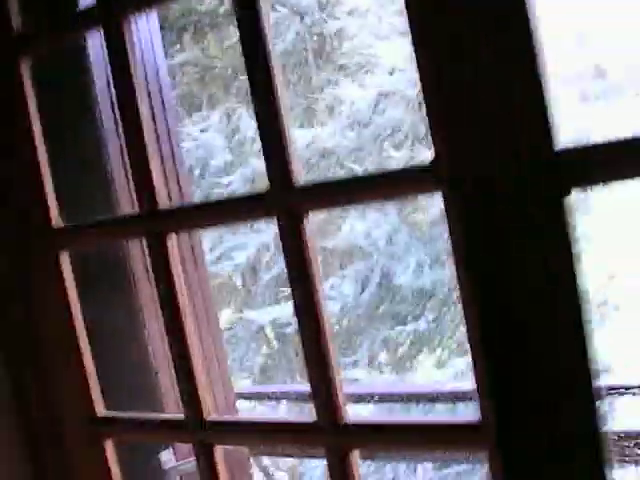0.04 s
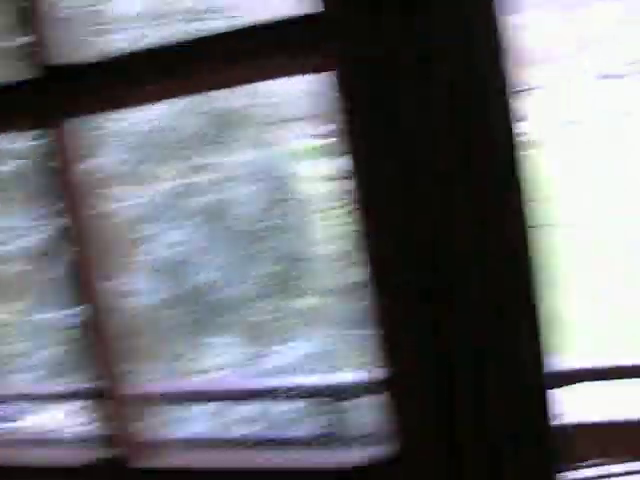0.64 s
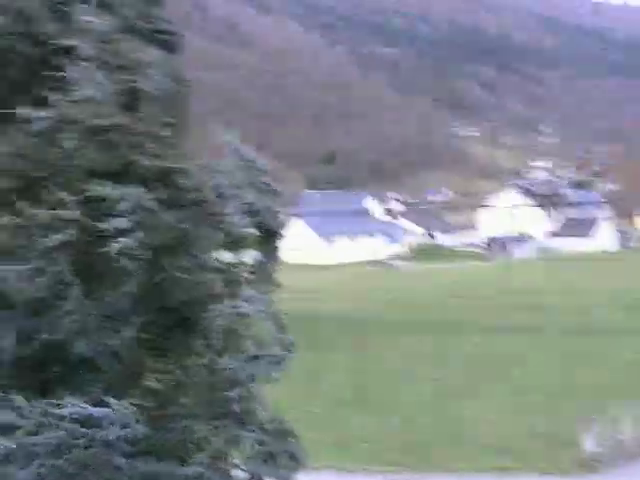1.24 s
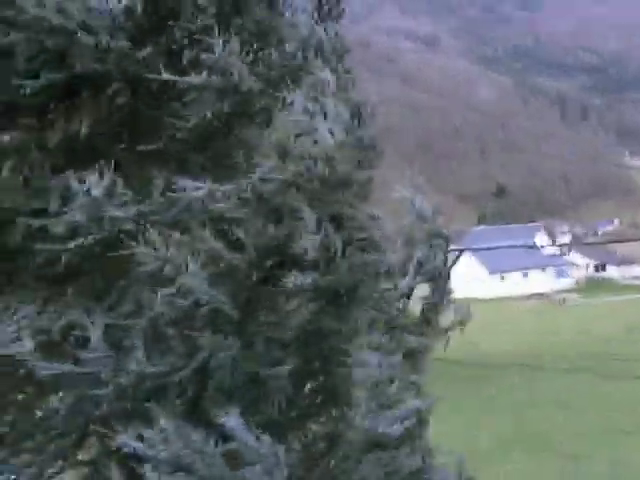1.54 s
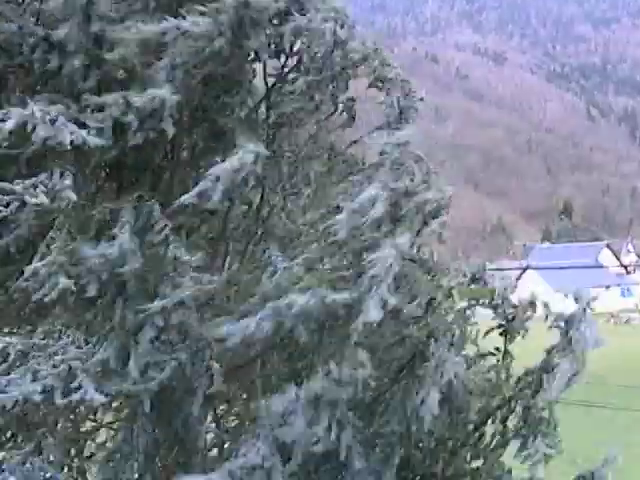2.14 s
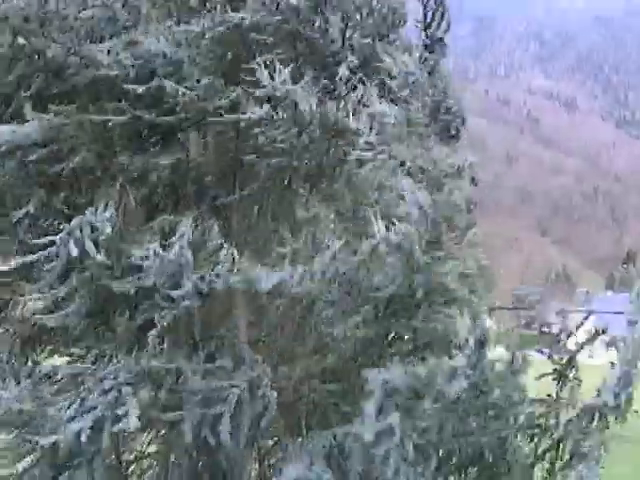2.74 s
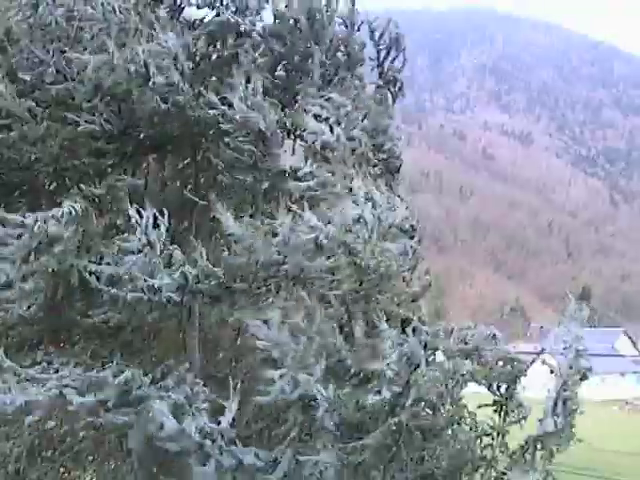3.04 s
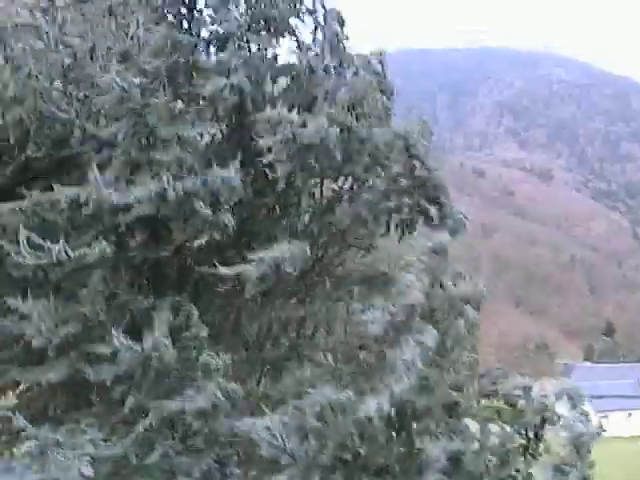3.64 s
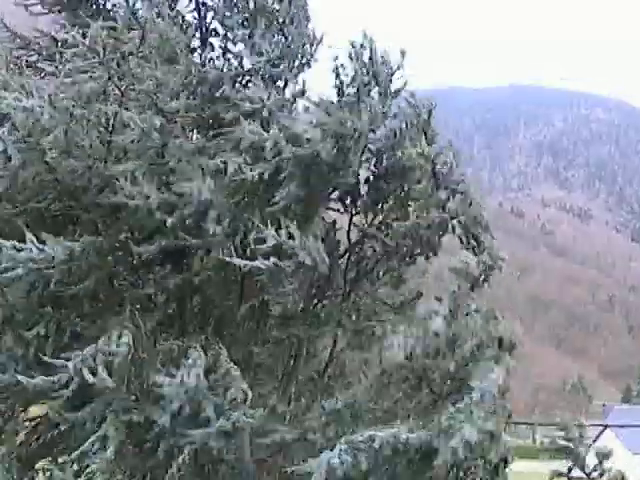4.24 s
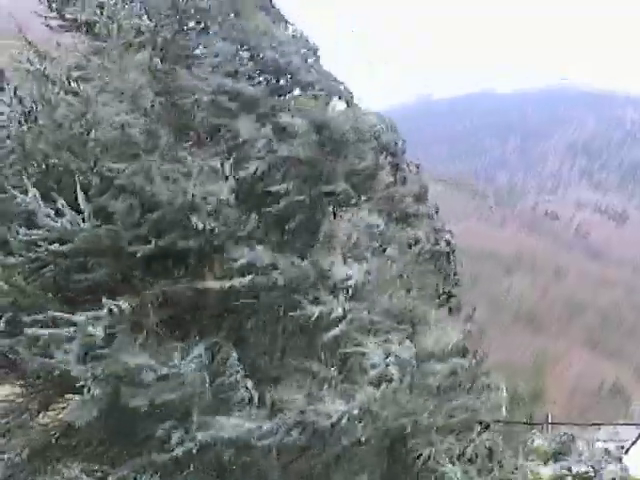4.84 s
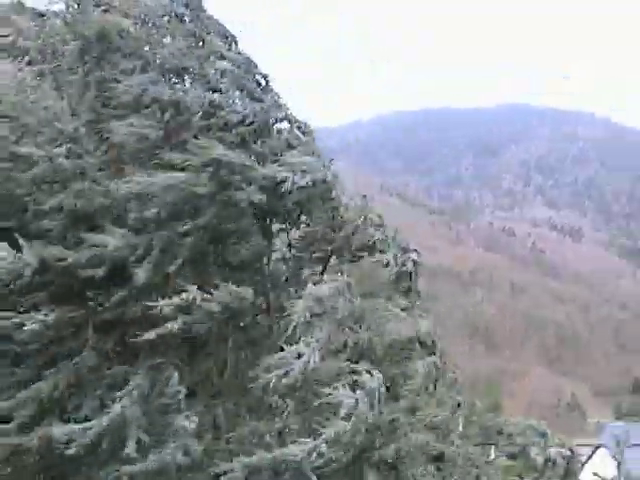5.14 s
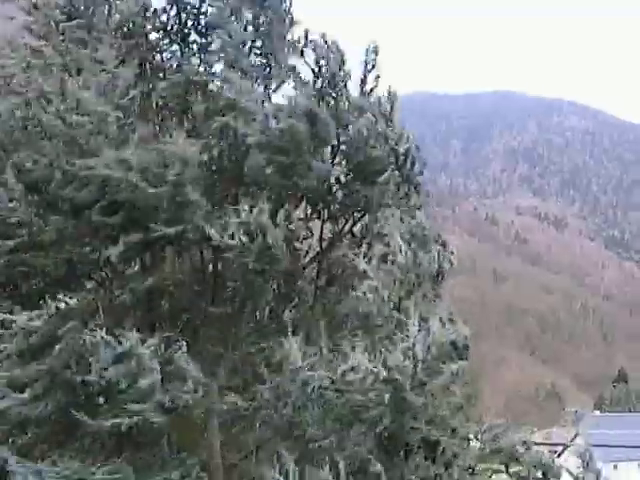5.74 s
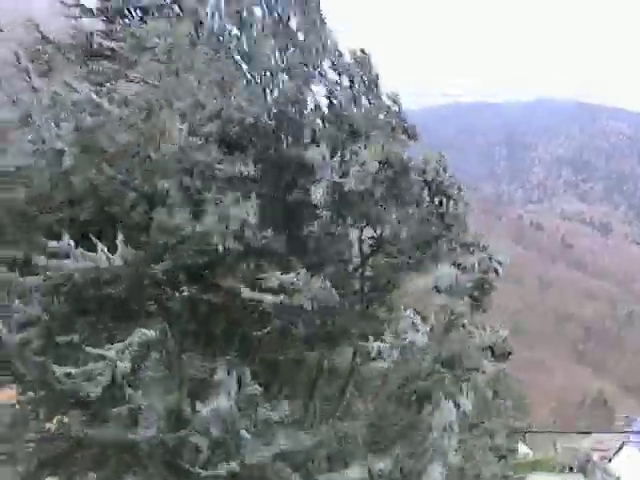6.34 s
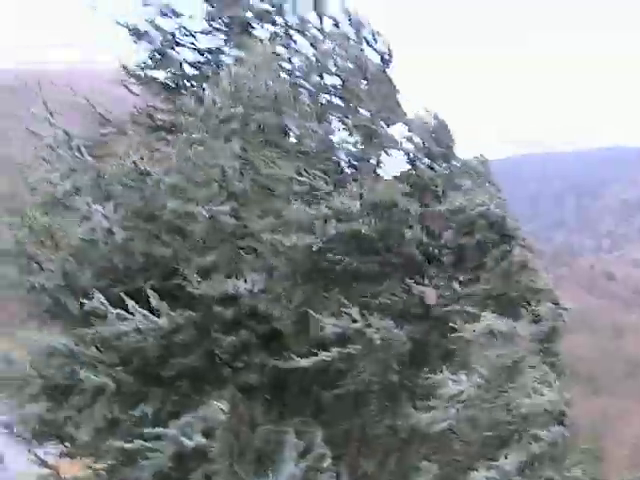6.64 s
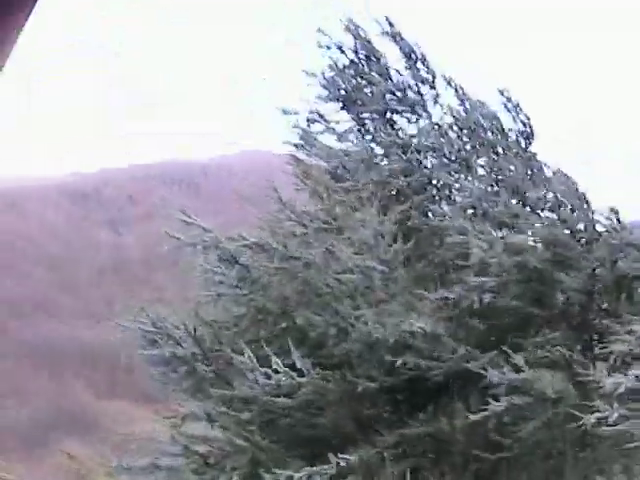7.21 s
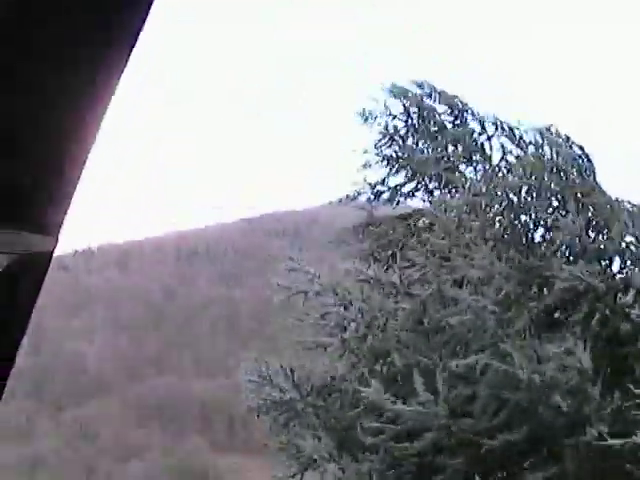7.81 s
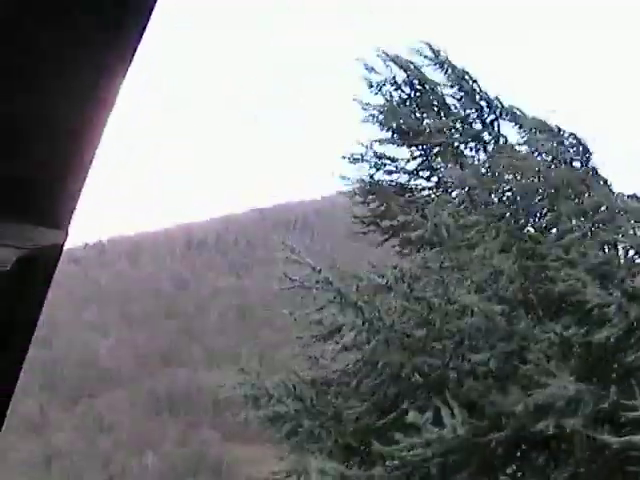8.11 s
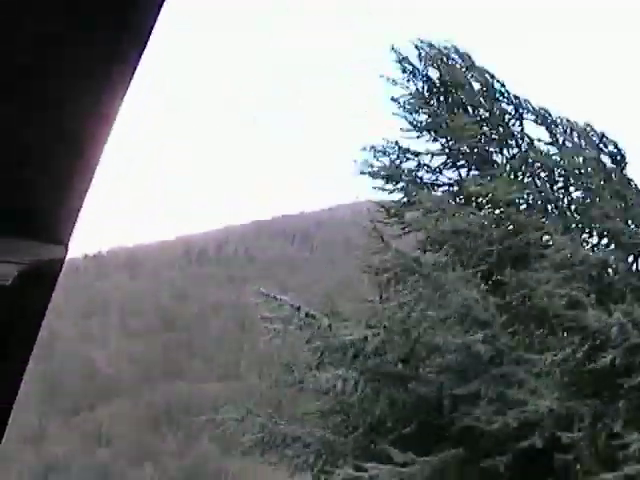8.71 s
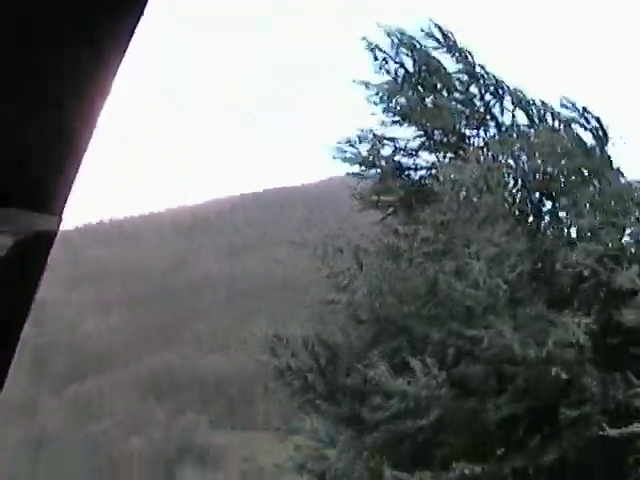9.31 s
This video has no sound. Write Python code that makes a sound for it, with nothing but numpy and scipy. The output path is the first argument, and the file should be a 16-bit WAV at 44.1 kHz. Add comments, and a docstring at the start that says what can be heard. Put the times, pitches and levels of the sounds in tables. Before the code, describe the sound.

Storm wind blows through a big conifer outside an open window, a broad hiss of needles over a low boom. It starts subdued and quickly swells to a roar. Gusts buffet and slap the hand-held microphone with ragged rumbles, and the strongest make the whole roar drop abruptly and spring back. Faint gliding whistles pass midway. Near the end the buffeting eases while the roar continues.

```python
"""A hiss of needles over a low boom: storm wind roars through a big conifer outside an open window.
Air sheds vortices from needles and branches as broadband noise, and from twigs as gliding whistles.
Eddies buffet and slap the two microphone ports of a small hand-held camera. The strongest gusts
press so hard on the microphone that its limiter pulls the whole roar down."""
import sys
import numpy as np
from scipy import signal
from scipy.fft import rfft, irfft
from scipy.io import wavfile
from scipy.ndimage import uniform_filter1d

SR = 44100
rng = np.random.default_rng(int(sys.argv[2]) if len(sys.argv) > 2 else 0)


def wav_record(signal):
    """Record a signal, one row per channel, as 16-bit PCM in the file named by sys.argv[1]."""
    frames = np.transpose(np.atleast_2d(signal))
    bounded = np.clip(frames, -1, 1)
    # unit amplitude maps onto the largest positive 16-bit level
    quanta = np.round(bounded * 32767).astype(np.int16)
    wavfile.write(sys.argv[1], SR, quanta)


N = 413216
TIME = np.arange(N) / SR
FREQS = np.maximum(np.arange(N // 2 + 1) * SR / N, 1)

# wind in the crown: (time [s], relative hiss level [dB], extra body around 900 Hz [dB])
CROWN_WIND = [(0, -27, -4), (0.11, -31.5, -3.5), (0.33, -30, -4), (0.6, -24.5, -6.5), (1.0, -23, -2),
              (1.5, -18, -4), (2.5, -21.5, 0.5), (2.85, -17.5, -0.5), (3.25, -21, 2.5), (4.2, -17.5, 0.5),
              (4.72, -15.5, 0), (5.0, -17, 1), (5.62, -15, -0.7), (6.85, -18, 2.5), (7.62, -17, 4),
              (8.2, -18.5, 0.5), (8.8, -16, 0), (9.37, -15, -1)]


def undb(db):
    """Amplitude ratio of a level in decibels."""
    return 10 ** (np.asarray(db) / 20)


def curve(table, column=1):
    """Linear interpolation of one column of a time table at every sample."""
    rows = np.array(table)
    return np.interp(TIME, rows[:, 0], rows[:, column])


def across(points):
    """Interpolation of a frequency table on a logarithmic axis."""
    hz, value = np.transpose(points)
    return np.interp(np.log(FREQS), np.log(hz), value)


def unit(x):
    """Normalisation to rms 1."""
    return x / np.sqrt(np.mean(x ** 2))


def smooth(x, seconds):
    """Low-pass filtering by a running mean."""
    return uniform_filter1d(x, max(int(seconds * SR), 1))


def drift(cutoff_hz):
    """Random modulation: low-pass noise of rms 1."""
    return unit(irfft(rfft(rng.standard_normal(N)) * np.exp(-(FREQS / cutoff_hz) ** 2), N))


def noise(gain, correlation):
    """Coloured stereo noise of rms 1; the ratio of mid to side sets its left-right correlation."""
    mid, side = rfft(rng.standard_normal((2, N)))
    c = np.clip(correlation, -.99, .99)
    mid, side = mid * np.sqrt(1 + c), side * np.sqrt(1 - c)
    return unit(irfft(np.array([mid + side, mid - side]) * gain, N))


def steady(x, seconds):
    """Division by the running rms holds a noise level over spans longer than seconds."""
    power = np.mean(x ** 2, axis=0)
    return x / np.sqrt(smooth(smooth(power, seconds), seconds))


def surges(events, rest_db, rise_db_per_s, sag_db_per_s, fall_db_per_s):
    """Upper envelope in dB of events that rise to a peak at their time, sag while held, then decay."""
    out = rest_db
    for time, hold, db in events:
        age = TIME - time
        drop_db = rise_db_per_s * np.maximum(-age, 0) + sag_db_per_s * np.clip(age, 0, hold)
        drop_db += fall_db_per_s * np.maximum(age - hold, 0)
        out = np.maximum(out, db - drop_db)
    return out


def needle_hiss(level_db=2.0, sway_db=0.16, flicker_db=1.16, thrash_db=-0.36):
    """Vortex shedding: thick branches give the roar its body, fine needles its treble edge."""
    # hiss spectrum: (frequency [Hz], relative density [dB])
    spectrum = [(200, -13), (420, -6.5), (700, -5.5), (1200, -3.5), (1700, -3.5), (2400, 0), (3300, -1.5),
                (4200, -2.5), (5500, -6), (6500, -8.5), (10000, -15), (13400, -22.5)]
    # likeness of the hiss at the two ports: (frequency [Hz], correlation [1])
    correlation = [(60, 0.93), (300, 1), (1000, 0.93), (2000, 0.67), (3200, 0.29), (5000, .36),
                   (13000, 0.15)]
    # lean of the hiss to one side: (frequency [Hz], left minus right [dB])
    lean = [(200, 0), (650, -0.5), (1200, -2), (2200, -3), (3900, 0), (7000, 1.3)]
    # the camera draws back behind the window frame, dulling the hiss: (time [s], treble tilt [dB])
    frame_shadow = [(6.9, 0.3), (7.7, -0.6)]
    wind_db, body_db = curve(CROWN_WIND), curve(CROWN_WIND, column=2)
    tilt_db = 3.5 * np.tanh((wind_db + 16.5) / 4.5) + curve(frame_shadow)  # faster air is brighter
    balance = undb(np.array([[.5], [-.5]]) * across(lean))
    hiss = rfft(noise(undb(across(spectrum)) * balance, across(correlation)))
    octave = np.clip(np.log2(FREQS / 400), 0, 5)
    out = 0
    for k in range(6):  # boughs of each size sway and flicker in their own octave
        band = irfft(hiss * np.maximum(1 - abs(octave - k), 0), N)
        centre_hz = 400 * 2 ** k
        body = body_db * np.exp(-(np.log2(centre_hz / 900) / 0.58) ** 2 / 2)
        edge = tilt_db * np.tanh(2 * np.log2(centre_hz / 3600)) / 2
        out = out + band * undb(body + edge + sway_db * drift(1.9) + flicker_db * drift(18))
    return out * undb(level_db + wind_db + thrash_db * drift(31))  # all thrash together


def storm_boom(level_db=-3.0, follow=0.64, build_db_per_s=0.19):
    """Low-frequency flow noise around the house swells less than the hiss and builds with the storm."""
    # boom spectrum: (frequency [Hz], relative density [dB])
    spectrum = [(25, -12), (60, -17), (100, -7), (160, -7), (215, 0.5), (280, -2), (320, -10), (370, -29.5),
                (600, -42.5)]
    swell_db = follow * (curve(CROWN_WIND) + 16) - 16 + build_db_per_s * TIME
    roar = steady(noise(undb(across(spectrum)), correlation=0.98), 0.047)
    return roar * undb(level_db + swell_db)


def buffeting(level_db=1, wander_db=0.74, flutter_db=2.76, lurch_db=0.55):
    """Turbulent pressure: an eddy pushes on one port as it sucks on the other, largely in antiphase."""
    # eddy spectrum: (frequency [Hz], relative density [dB])
    spectrum = [(22, -42), (45, -3.5), (65, -3.5), (100, 1.5), (160, 2), (220, -0.5), (280, -1.5),
                (320, -14), (375, -22.5), (550, -24), (800, -27), (1500, -32.5), (5000, -61)]
    # swirls of rough air passing the ports: (time [s], hold [s], relative level [dB])
    swirls = [(0.63, 0.045, -29), (0.81, 0.019, -17.5), (1.07, .22, -13), (1.36, 0.17, -23.5),
              (1.62, .15, -15.5), (1.78, .235, -14), (2.16, .23, -12.5), (2.49, 0.26, -11.5),
              (2.88, 0.018, -19), (2.98, .02, -15.5), (3.46, 0.028, -11), (3.62, 0.035, -8),
              (3.77, 0.17, -12), (4.02, 0.025, -7), (4.5, 0.032, -22), (5.0, 0.14, -13.5),
              (5.52, 0.11, -15), (5.7, 0.019, -9.5), (5.82, 0.059, -9.5), (5.98, .14, -13),
              (6.24, 0.12, -9.5), (6.49, 0.077, -8.5), (6.67, 0.033, -11.5), (6.76, 0.66, -16),
              (7.35, 0.56, -14), (7.9, 0.28, -17.5), (8.76, .04, -18.5), (9.07, 0.048, -10.5),
              (9.35, 0.024, -21)]
    rumble = steady(noise(undb(across(spectrum)), correlation=-0.69), 0.034)
    calm_db = curve(CROWN_WIND) - 17.5
    swirl_db = surges(swirls, calm_db, rise_db_per_s=265, sag_db_per_s=0.5, fall_db_per_s=144)
    ragged_db = lurch_db * drift(13) + flutter_db * drift(36)
    side_db = wander_db * drift(4.7) * np.array([[1], [-1]])
    return rumble * undb(level_db + swirl_db + ragged_db + side_db)


def air_slaps(crackle_db=-6, thump_db=-2, length_s=0.014, tear_db=3, thump_hz=240, width_hz=50):
    """Pressure pulses: a slap of air thumps both ports in phase, under a torn, uncorrelated crackle."""
    # slaps on the ports: (time [s], relative crackle level [dB], relative thump level [dB])
    slaps = [(1.186, -17, -4), (1.932, -15.5, -13.5), (2.015, -17.5, -17), (2.55, -19, -21),
             (3.45, -14, -20), (3.621, -21, -7.5), (3.661, -20, -18), (5.726, -15.5, -16),
             (5.89, -16.5, -11), (6.249, -28, -10.5), (6.51, -15, -24), (6.576, -17, -28),
             (7.356, -14.5, -20), (7.498, -21, -33)]
    # crackle spectrum: (frequency [Hz], relative density [dB])
    spectrum = [(200, 1), (380, -3.5), (560, 4), (750, -7), (1400, -12.5), (9000, -48)]
    crackle = steady(noise(undb(across(spectrum)), correlation=0), 0.022)
    crackle *= undb(crackle_db + tear_db * drift(250))
    thump_band = np.exp(-((FREQS - thump_hz) / width_hz) ** 2)
    thump = steady(noise(thump_band, correlation=1), 0.034) * undb(thump_db)
    out = np.zeros((2, N))
    for time, high_db, low_db in slaps:
        on = abs(TIME - time) < 10 * length_s
        pulse = np.exp(-((TIME[on] - time) / length_s - .5) ** 2)
        out[:, on] += pulse * (undb(high_db) * crackle[:, on] + undb(low_db) * thump[:, on])
    return out


def gust_pressure():
    """Dynamic pressure: gusts load the microphone with slow shoves, mostly below the audible range."""
    # shoves of wind: (time [s], hold [s], level over the limiter threshold [dB])
    shoves = [(1.232, 0.079, 8), (1.672, 0, 9), (1.705, 0, 15.5), (1.782, 0.052, 21), (1.828, 0.01, 28.5),
              (1.959, 0, 33), (2.034, .033, 31.5), (2.123, 0.16, 24.5), (2.364, 0.011, 9.5), (2.413, 0, 9),
              (3.488, 0.023, 10), (3.629, 0.047, 9), (3.687, 0, 16), (5.004, 0.026, 4.5),
              (5.115, 0.00061, 9.5), (5.697, 0.092, 12), (5.757, 0.037, 24.5), (5.866, 0.065, 23.5),
              (5.909, 0.0024, 29), (5.982, 0.017, 21.5), (6.024, 0.0084, 21.5), (6.066, 0.011, 21.5),
              (6.146, 0.016, 22), (6.27, 0.18, 8), (6.357, 0.038, 15.5), (6.444, 0.051, 13),
              (6.526, 0, 16.5), (6.565, 0.045, 15.5), (6.607, 0, 17.5), (6.692, .055, 15), (7.158, 0.12, 7),
              (7.255, 0.016, 20.5), (7.3, 0.075, 21.5), (7.375, 0.0098, 24.5), (7.425, 0.038, 25),
              (7.456, 0, 22), (7.76, 0.014, 3.5)]
    return undb(surges(shoves, rest_db=0, rise_db_per_s=1142, sag_db_per_s=68, fall_db_per_s=202))


def twig_whistles(pure_hz=22):
    """Aeolian tones glide with the air speed; narrow ones hold a note, wide ones are breathy."""
    # air passing twigs:
    # (time [s], duration [s], first pitch [Hz], last pitch [Hz], bandwidth [Hz], level [dB])
    whistles = [(2.35, 1.24, 2770, 2440, 300, -35), (4.301, .43, 1490, 1650, 34, -22.5),
                (4.402, 0.23, 1965, 2170, 60, -27), (4.563, 0.32, 2210, 2400, 150, -23),
                (4.76, .26, 2320, 2030, 70, -27), (4.9, 0.134, 1580, 1770, 45, -25),
                (6.42, 0.27, 3800, 3780, 40, -27)]
    out = np.zeros(N)
    for start, length, first_hz, last_hz, width_hz, db in whistles:
        on = (TIME > start) & (TIME < start + length)
        progress = (TIME[on] - start) / length
        coherence_s = .5 / width_hz
        jitter = smooth(smooth(rng.standard_normal((2, N)), coherence_s), coherence_s)
        waver, breath = unit(jitter[0, on]), unit(jitter[1, on])
        pitch_hz = first_hz + (last_hz - first_hz) * progress + width_hz * waver / 2
        phase = 2 * np.pi * np.cumsum(pitch_hz) / SR
        tone = unit((pure_hz / width_hz + breath / 2) * np.cos(phase))
        out[on] += undb(db) * np.sin(np.pi * progress) * tone
    return out


def limiter(x, sense_s=0.011, release_db_per_s=380):
    """Automatic gain control: the gain drops when the load passes 1 and recovers at a steady rate."""
    load = smooth(smooth(np.abs(x.mean(axis=0)), sense_s), sense_s / 2)
    over_db = 20 * np.log10(np.maximum(load, 1))
    recovery_db = release_db_per_s * TIME
    return x * undb(recovery_db - np.maximum.accumulate(over_db + recovery_db))


def scene():
    """Superposition of the storm's radiated sound and the wind's own pressure on the microphone."""
    radiated = needle_hiss() + storm_boom() + twig_whistles()
    # eddies and slaps ride on the slow pressure and grow with it
    return radiated + gust_pressure() * (1 + buffeting() + air_slaps())


def record(dry, bass_hz=25, notch_hz=7890, top_hz=13450):
    """Signal chain: the limiter ducks under slow pressure; then bass cut, clipping, notch, treble cut."""
    bass_cut = signal.butter(2, bass_hz, "high", fs=SR, output="sos")
    notch = signal.iirnotch(notch_hz, Q=2.6, fs=SR)
    treble_cut = signal.ellip(12, .2, 70, top_hz, fs=SR, output="sos")
    audible = signal.sosfiltfilt(bass_cut, limiter(dry), padtype="even", padlen=8000)
    notched = signal.lfilter(*notch, np.clip(audible, -1, 1))
    return signal.sosfilt(treble_cut, notched)


dry = scene()
out = record(dry)
wav_record(out)
```